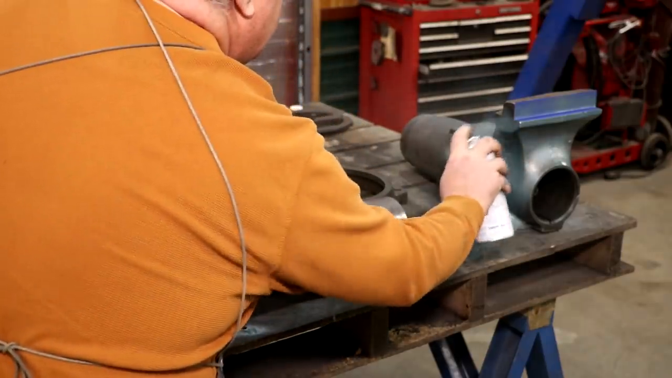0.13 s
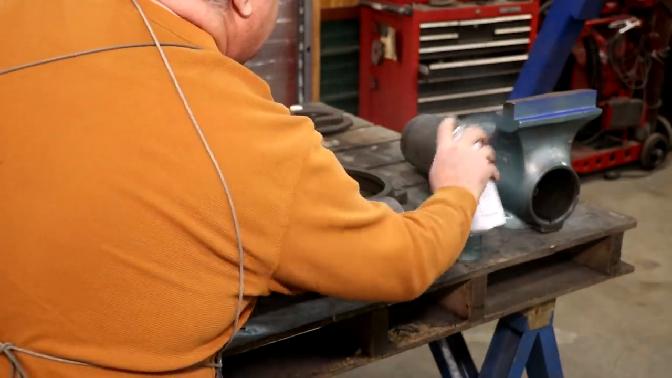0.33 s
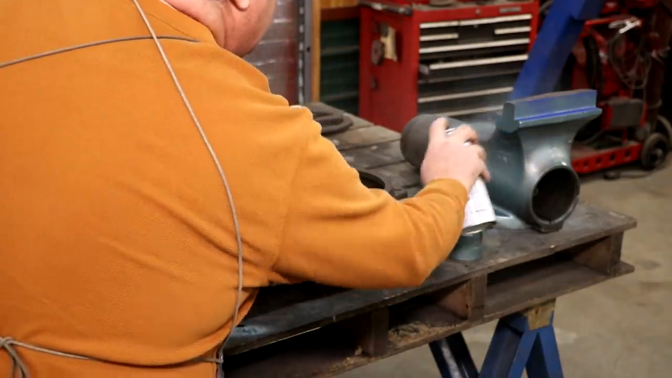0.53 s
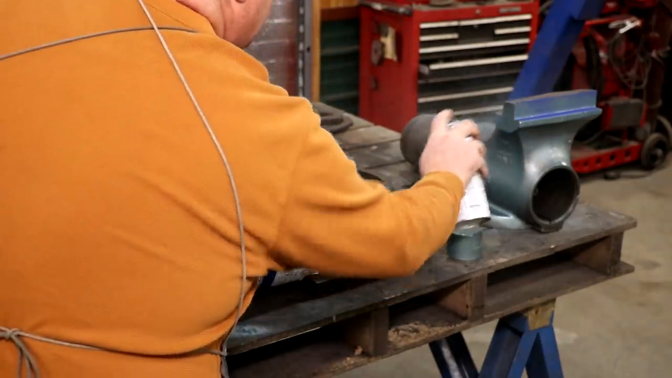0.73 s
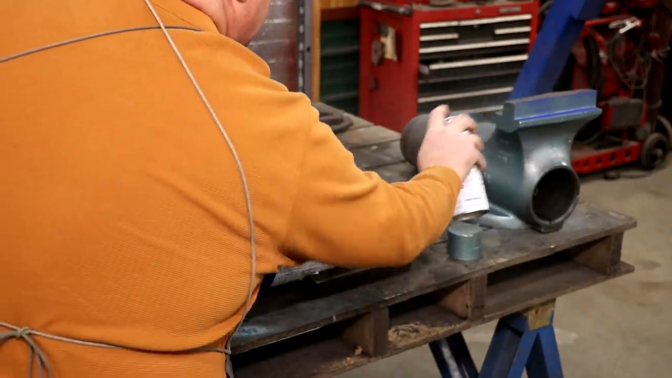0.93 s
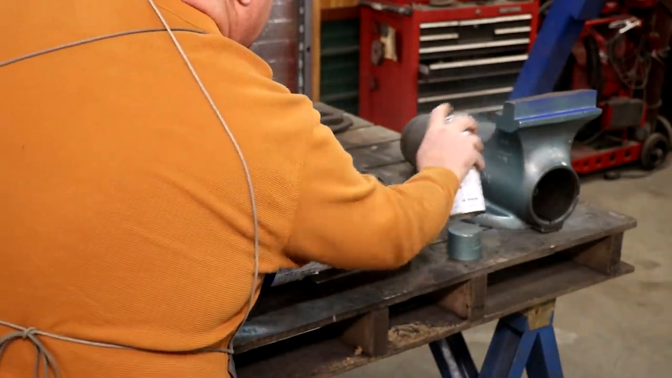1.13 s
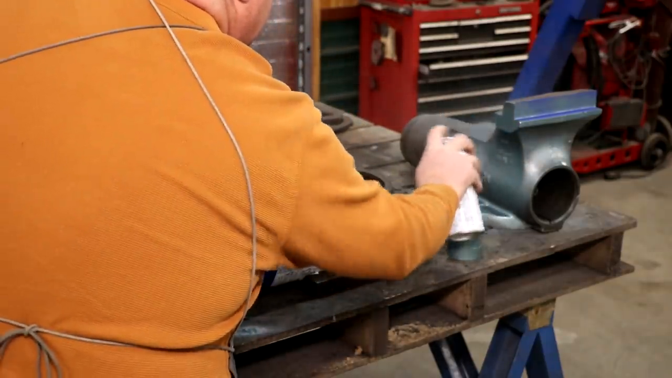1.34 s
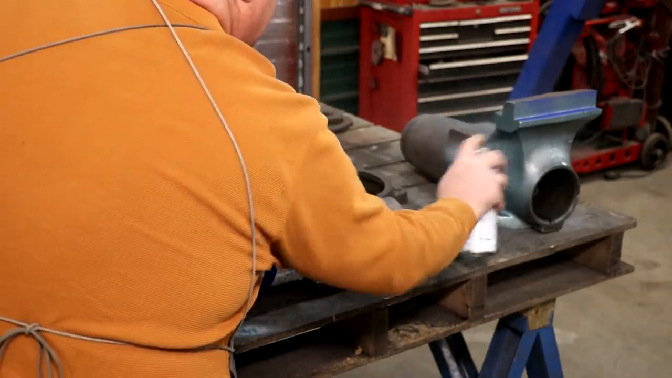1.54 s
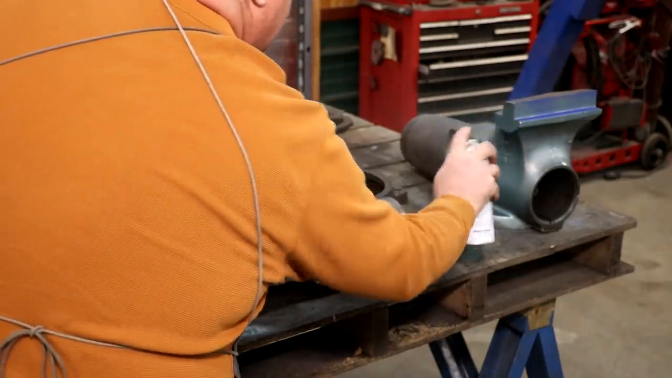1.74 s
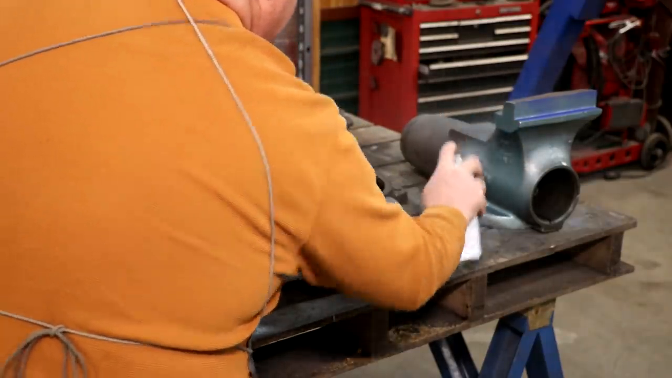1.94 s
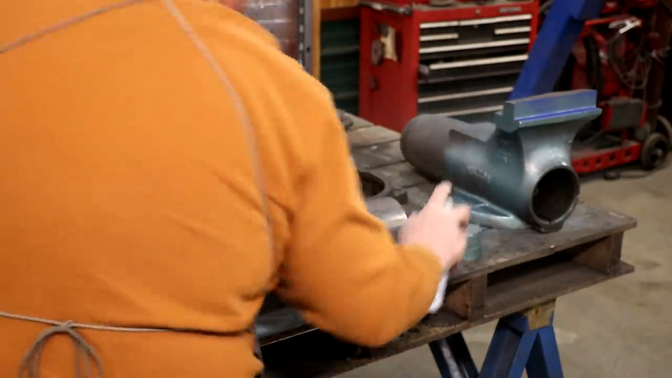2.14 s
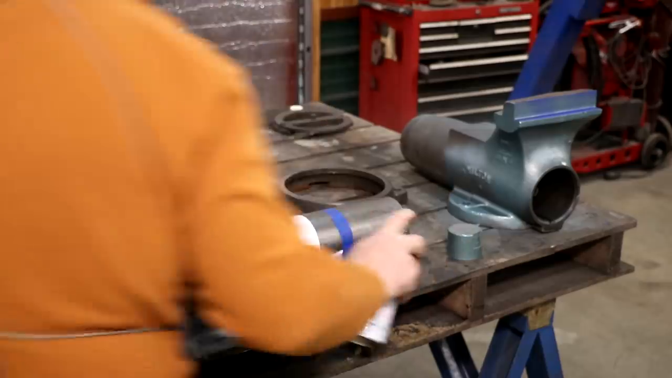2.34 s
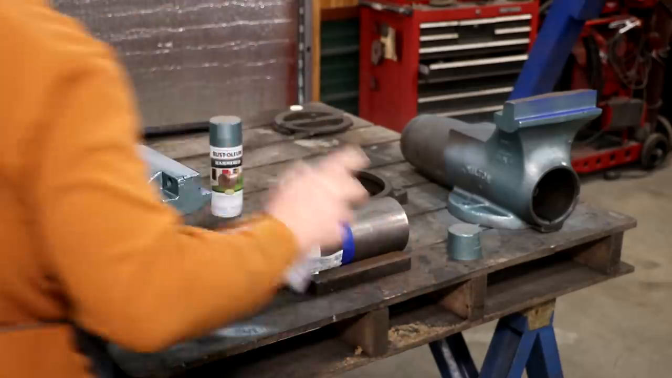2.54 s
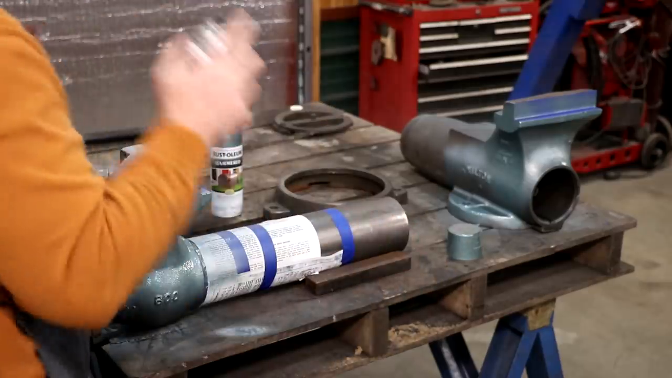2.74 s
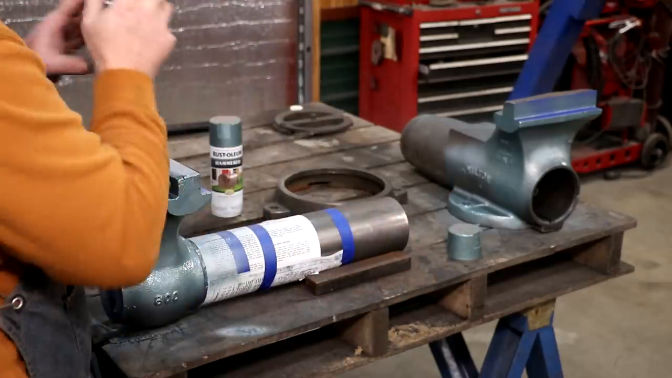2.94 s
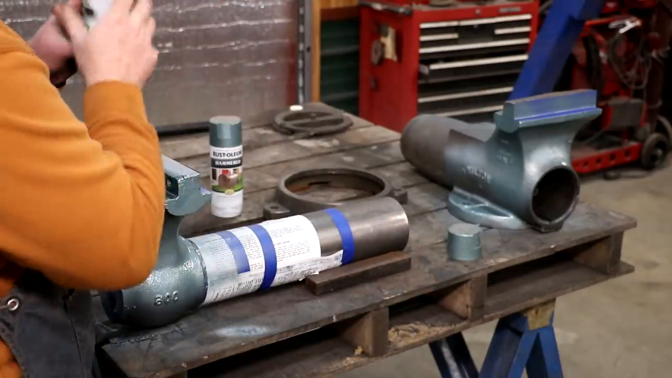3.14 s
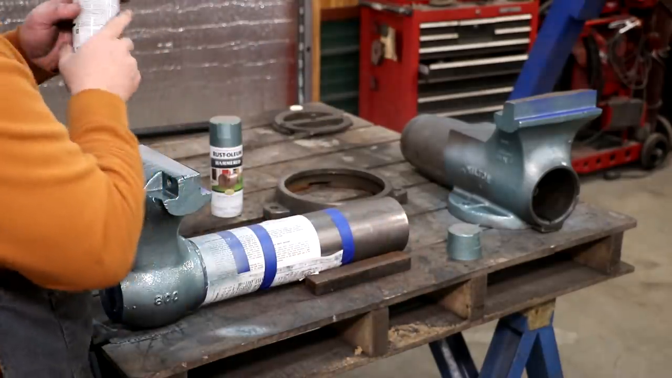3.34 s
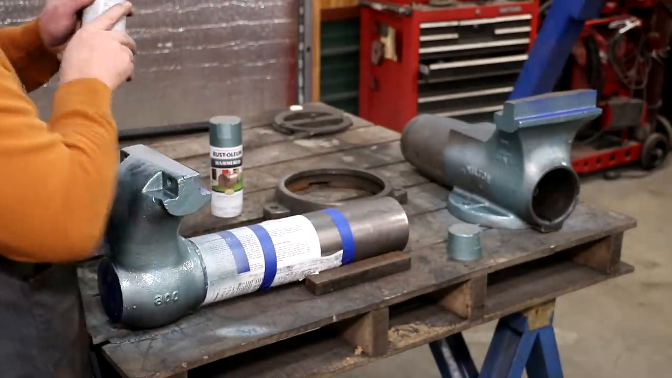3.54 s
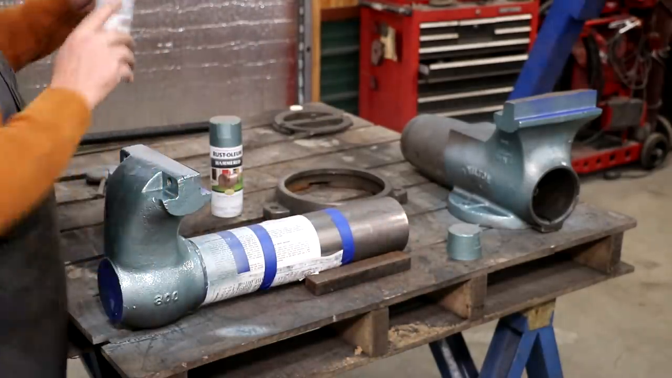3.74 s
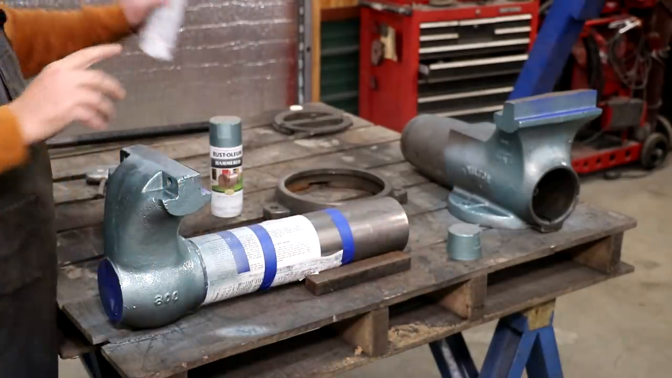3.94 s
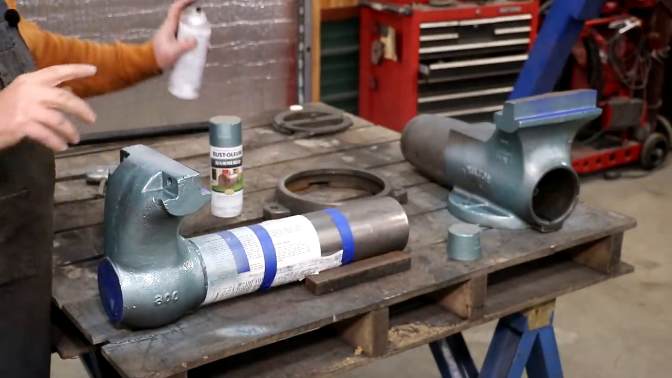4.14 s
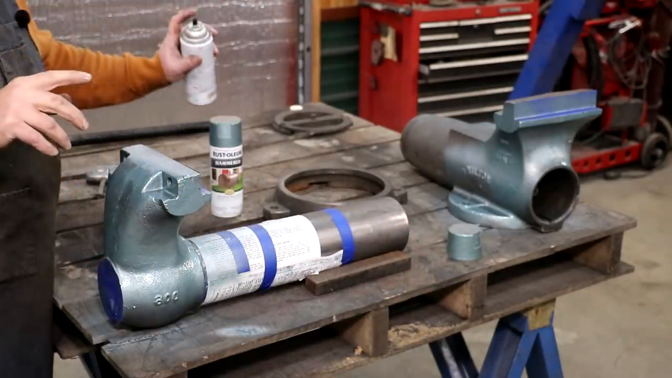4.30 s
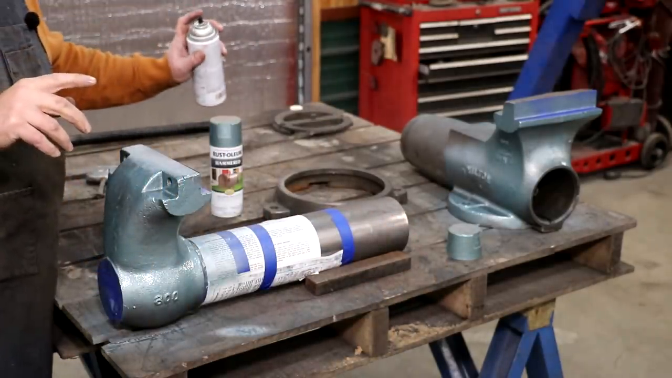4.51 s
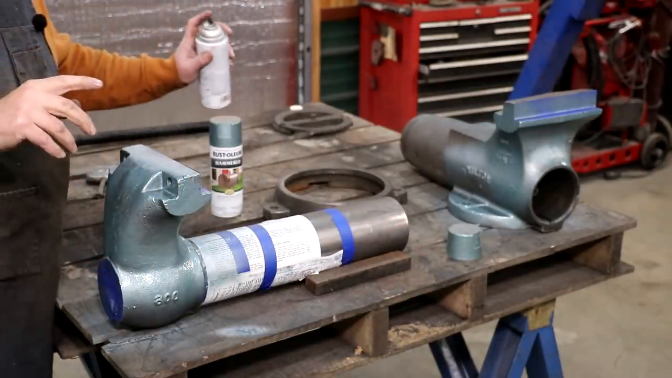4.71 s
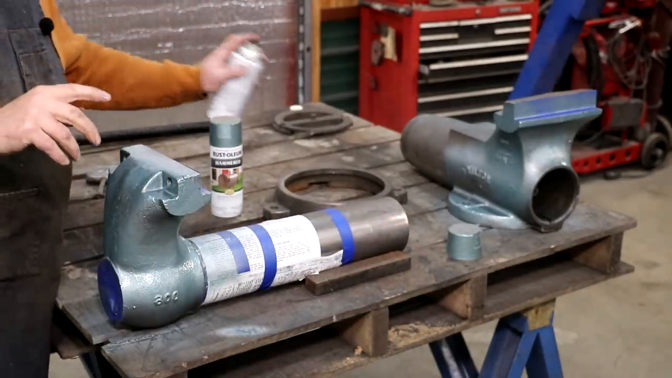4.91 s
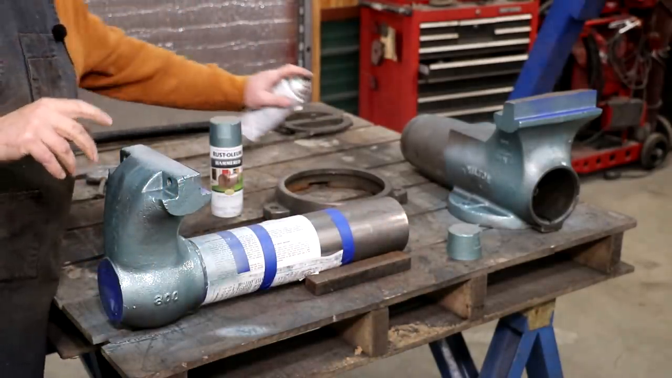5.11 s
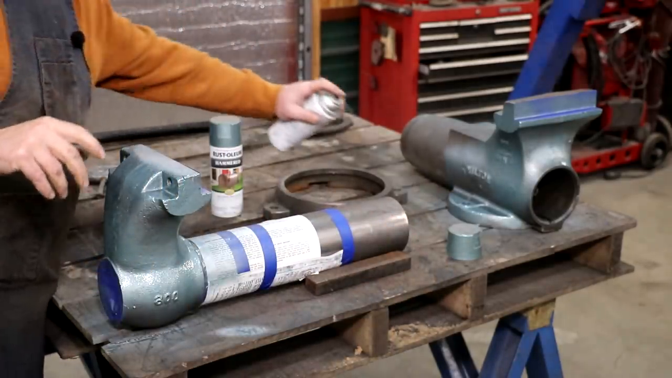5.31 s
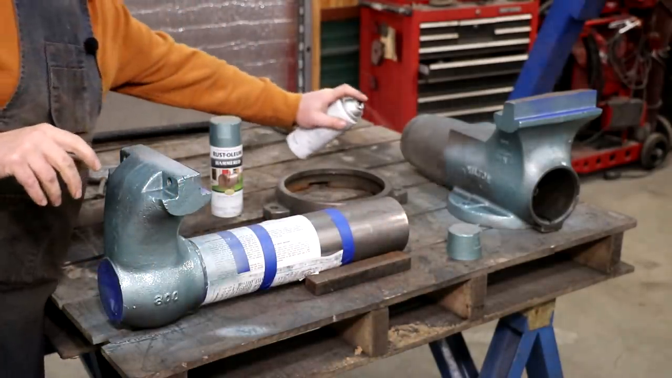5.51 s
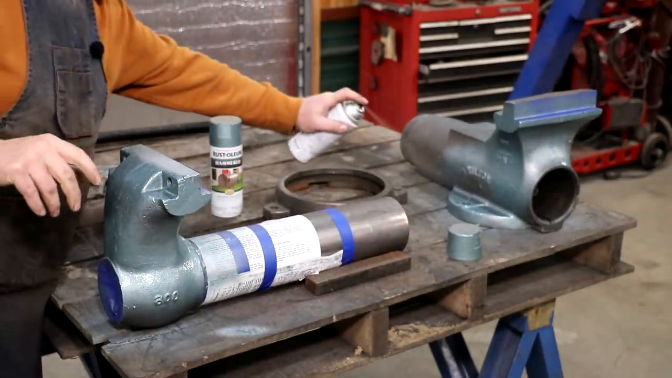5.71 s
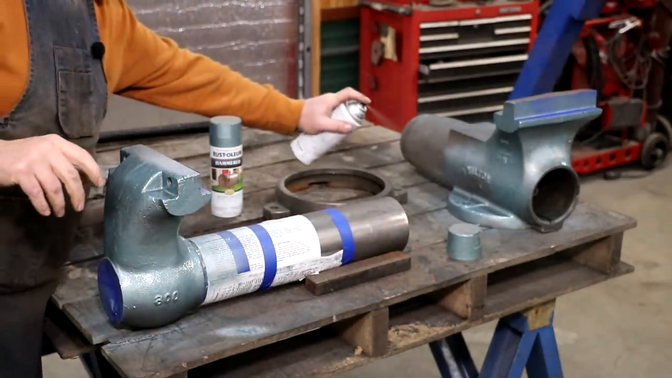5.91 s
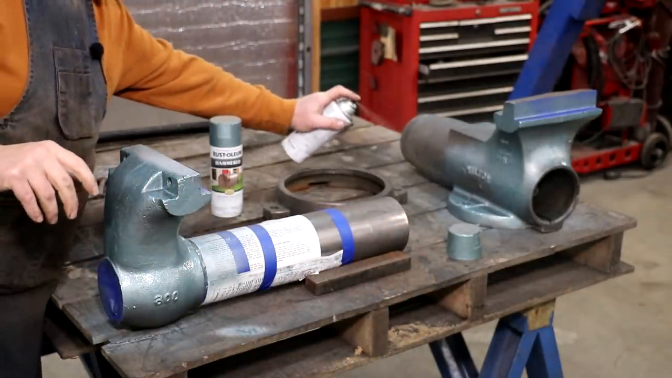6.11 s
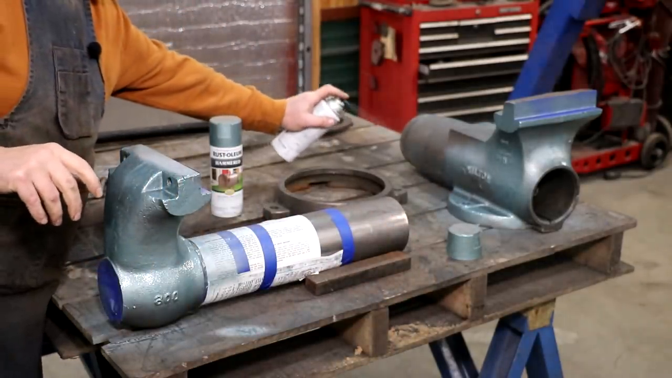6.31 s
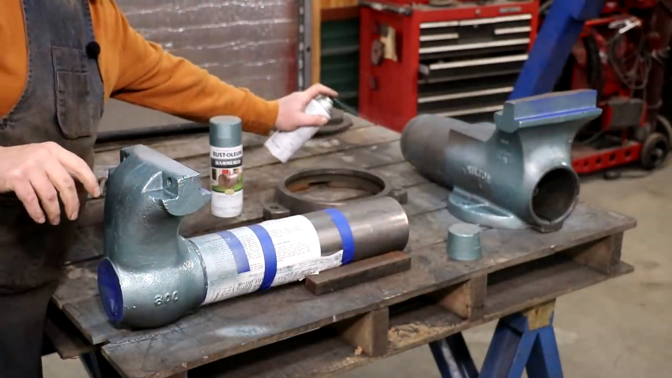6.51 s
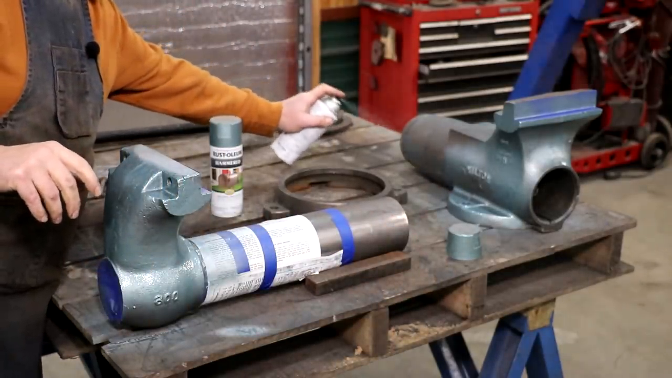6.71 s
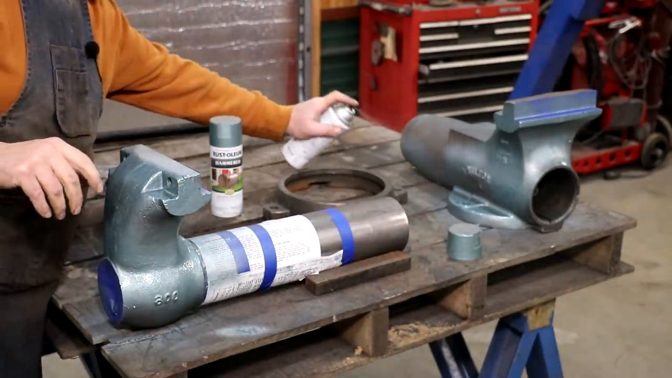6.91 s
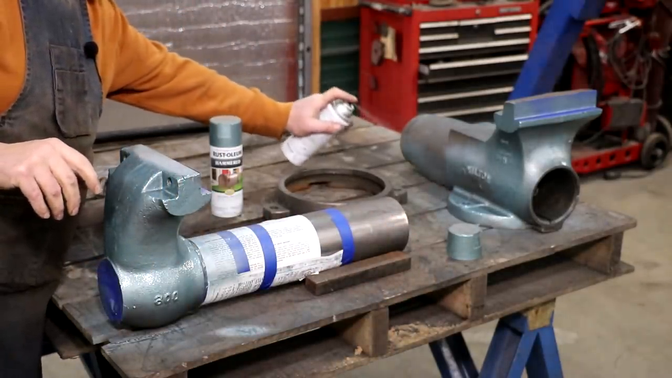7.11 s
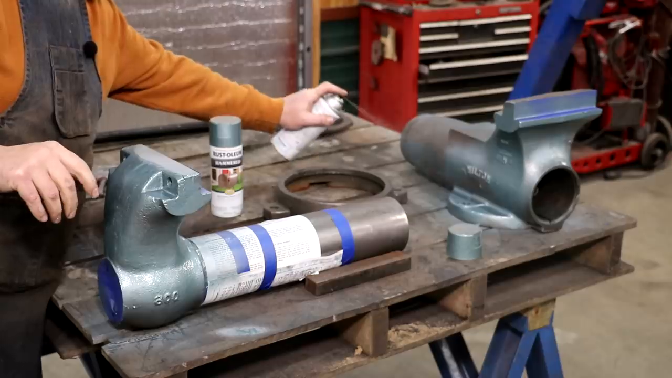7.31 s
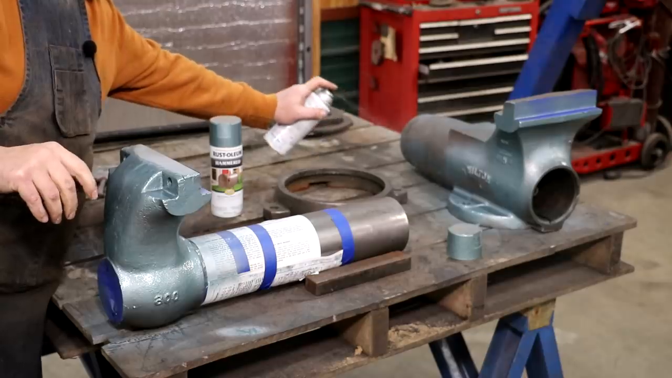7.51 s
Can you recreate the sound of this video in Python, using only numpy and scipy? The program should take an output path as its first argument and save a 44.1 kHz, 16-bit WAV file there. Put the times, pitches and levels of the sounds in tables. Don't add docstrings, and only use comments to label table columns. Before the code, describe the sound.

In a workshop, heard from a small clip-on microphone, an aerosol can sprays with a full, bright, wavering hiss for two seconds. It cuts off; coat cloth swishes and rumbles against the microphone while the mixing ball rolls and knocks sharply inside the steel can. A short squirt runs into a second, slightly thinner hiss. Near the end a metal part is knocked, rings dully and rattles on boards as everything fades.

```python
import sys
import numpy as np
from scipy import signal
from scipy.fft import rfft, irfft
from scipy.io import wavfile
from scipy.ndimage import uniform_filter1d

SR = 44100
rng = np.random.default_rng(int(sys.argv[2]) if len(sys.argv) > 2 else 0)


def invert_db(x):
    u = np.asarray(x, float) / 20
    return 10 ** u


def int16_out(signal):
    q = np.round(np.clip(np.atleast_2d(signal).T, -1, 1) * 32767)
    wavfile.write(sys.argv[1], SR, q.astype(np.int16))


N = 332955
TIME = np.arange(N) / SR
FREQ = np.maximum(np.fft.rfftfreq(N, 1 / SR), 1)
TOP_HZ = 15750


def unit(x):
    return x / np.sqrt(np.mean(x ** 2))


def shape(points, hz_at=FREQ):
    hz, db = np.transpose(points)
    return invert_db(np.interp(np.log(hz_at), np.log(hz), db)) * (hz_at < TOP_HZ)


def coloured_noise(points):
    return unit(irfft(rfft(rng.standard_normal(N)) * shape(points), N))


def bandpass(low_hz, high_hz):
    return signal.butter(2, [low_hz, high_hz], "bandpass", fs=SR, output="sos")


def walk(rate):
    hold = int(SR / 64 / rate) + 1
    steps = np.repeat(rng.standard_normal(N // 64 // hold + 2), hold)
    steps = uniform_filter1d(uniform_filter1d(steps, hold), hold)
    return np.interp(TIME, np.arange(len(steps)) * 64 / SR, steps / steps.std())


def swells(s, peaks_db, fall_s, still_db):
    rise_share, roundness = .8, 1.6
    t = TIME[::64, None] - s
    from_peak = np.where(t < 0, -t / rise_share, t) / fall_s
    db = peaks_db - 10 * from_peak ** roundness
    power = np.sum(invert_db(db) ** 2, axis=1) + invert_db(still_db) ** 2
    return np.interp(TIME, TIME[::64], 10 * np.log10(power))


def grains(spread_db):
    sizes = uniform_filter1d(invert_db(spread_db * rng.exponential(size=N)), size=12)
    return unit(rng.standard_normal(N) * sizes)


def echoes(hz, sweep, count, longest_s, drift, gain):
    total = np.ones((len(hz), len(sweep)), complex)
    frames = np.linspace(0, N - 1, len(sweep)).astype(int)
    for delay_s in longest_s * rng.uniform(0.1983, 1, size=count):
        path_s = delay_s * sweep * (1 + drift * walk(3.0)[frames])
        total += gain * walk(9.0)[frames] * np.exp(2j * np.pi * np.outer(hz, path_s))
    power = np.abs(total) ** 2
    return np.sqrt(power / uniform_filter1d(power, size=12, axis=0))


def banded(source, colour, bands_hz, levels_db, patch_db, patch_hz, patch_s, peak_hz=None, peak_db=0):
    hz, t, z = signal.stft(source, SR, nperseg=512, noverlap=384)
    hz = np.maximum(hz, 1)
    gain = shape(colour, hz)
    own_db = [10 * np.log10(np.sum(gain[(hz > a) & (hz < b)] ** 2) / len(hz)) for a, b in bands_hz]
    centres = np.log(np.prod(bands_hz, axis=1)) / 2
    order = np.argsort(centres)
    db = 0
    for k, (level, own) in enumerate(zip(levels_db, own_db)):
        share = np.interp(np.log(hz), centres[order], order == k)
        db = db + np.outer(share, np.interp(t, TIME, level) - own)
    patches = rng.standard_normal(z.shape)
    for axis, size in enumerate([patch_hz / hz[1], patch_s / t[1]]):
        for _ in range(2):
            patches = uniform_filter1d(patches, int(size) + 1, axis=axis)
    db = db + patch_db * (.7 + hz[:, None] / 13000) * patches / patches.std()
    if peak_hz is not None:
        centre_hz = np.interp(t, TIME, peak_hz)
        db = db + peak_db * (np.exp(-((hz[:, None] - centre_hz) / 450) ** 2) - .3)
        sweep = np.sqrt(peak_hz.mean() / centre_hz)
        z = z * echoes(hz, sweep, count=12, longest_s=.005, drift=.08, gain=.18)
    return signal.istft(z * gain[:, None] * invert_db(db), SR, nperseg=512, noverlap=384)[1][:N]


def read(table, fade_s):
    s, *columns = np.transpose(table)
    gate = np.clip(np.minimum(TIME - s[0], s[-1] - TIME) / fade_s + 1, 0, 1)
    return [np.interp(TIME, s, c) for c in columns], gate


def ring(x, modes):
    out = np.zeros(len(x))
    for hz, db, t60 in modes:
        pole = np.exp(2j * np.pi * hz / SR - np.log(1000) / (t60 * SR))
        out += invert_db(db) * signal.lfilter([1], [1, -pole], x).imag
    return out


def struck(modes, gains_db, t):
    hz, db, t60 = np.array(modes).T[:, :, None]
    sign = rng.choice([-1, 1], size=hz.shape)
    decay = invert_db(db + gains_db[:, None] - 60 * t / t60)
    return np.sum(sign * decay * np.sin(2 * np.pi * hz * t), axis=0)


def add(out, s, x, peak_db):
    i = int(s * SR)
    out[i:i + len(x)] += (invert_db(peak_db) * x / np.abs(x).max())[:N - i]


# low_hz, high_hz
JET_BANDS = [(2500, 5500), (500, 2000), (6000, 8500), (11000, 15500)]


def spray(table, colour, nozzle_db, ridge_db):
    (jet_db, peak_hz, mist_db), gate = read(table, 0.0029)
    swell_db = jet_db - np.average(jet_db, weights=gate)
    follows = (.2, .3, .3)
    levels_db = [jet_db] + [db + share * swell_db for db, share in zip(nozzle_db, follows)]
    levels_db[-1] = levels_db[-1] + mist_db + 1.2 * walk(14)
    jet = banded(grains(2.64), colour, JET_BANDS, levels_db, 1.5, 380, 0.06, peak_hz, peak_db=ridge_db)
    return gate * invert_db(0.56 * walk(40)) * jet


# pitch_hz, level_db (per Hz)
JET_NEAR = [(150, -50), (250, -23), (683, -12), (949, -17.5), (1210, -13), (2300, -15), (2980, -5.5),
            (4070, -1.5), (4670, -2), (5850, -11), (8130, -10.5), (9670, -22), (14200, -17), (15700, -18)]
# start_s, level_db, brightest_hz, mist_change_db
FIRST_PASS = [(0, -31, 3600, 0.1), (.064, -35, 3950, 0.1), (.15, -32.5, 4000, 0.1), (.45, -34, 4000, 0.1),
              (.66, -33, 4050, 0.1), (.76, -35.5, 4050, 0.1), (.93, -29.5, 4350, 0.1),
              (1.03, -33, 4100, 0.1), (1.14, -32, 3900, 0.1), (1.235, -36.5, 4000, 0.1),
              (1.27, -34, 3900, 0.1), (1.41, -29.5, 4500, 0.1), (1.54, -34, 4100, 0.1),
              (1.75, -32, 4300, 0.1), (1.975, -32.5, 4100, 0.1)]


def first_pass():
    return spray(FIRST_PASS, JET_NEAR, nozzle_db=(-44.5, -43.5, -47), ridge_db=3.0)


# pitch_hz, level_db (per Hz)
SHOP_AIR = [(18, -33), (30, -12), (52, -10), (81, -27), (401, -25), (549, -27), (1300, -3.5), (1410, -2),
            (1570, -11), (2260, -11), (15700, -38)]


def still_air():
    return invert_db(-55) * coloured_noise(SHOP_AIR)


def room_tail(near):
    t60_s, level_db = 0.4, -16
    t = TIME[:SR // 2]
    tail = rng.standard_normal(len(t)) * invert_db(-60 * t / t60_s) * (t > .004)
    tail = signal.lfilter([1], [1, -.5], tail)
    return invert_db(level_db) * signal.fftconvolve(near, tail / np.linalg.norm(tail))[:N]


# pitch_hz, level_db (per Hz)
RUMBLE_COLOUR = [(12, -51), (20, -22.5), (97, -0.5), (394, -5.5), (756, -10.5), (1080, -24.5), (1200, -20),
                 (1560, -43), (2640, -120)]
# start_s, level_db, fall_10_db_s
RUBS = [(.9, -55.5, 2.6), (1.22, -50, .05), (2.1, -47, .12), (2.33, -45, .12), (2.48, -38, .09),
        (2.82, -46, .15), (3.04, -40, .15), (3.4, -48, .5), (3.77, -39, .13), (4.0, -48, .2),
        (4.29, -50, .1), (4.48, -58, .1), (4.62, -51, .1), (4.83, -54, .12), (5.0, -53, .15),
        (5.18, -48, .1), (5.31, -47, .07), (5.47, -53, .25), (5.72, -51, .12), (5.87, -50, .05),
        (6.5, -56.5, 1.5), (6.98, -45, .06), (7.3, -57, .6)]
# start_s, level_db (peak), pitch_hz
THUMPS = [
    (2.154, -25.5, 370),
    (4.825, -38.5, 275),
    (5.196, -33.5, 275),
    (5.421, -31, 296),
    (5.659, -36, 240),
    (5.711, -38, 266),
    (5.851, -33.5, 194),
]


def microphone_rub():
    db = swells(*np.transpose(RUBS), still_db=-62)
    out = invert_db(db + 2.0 * walk(20)) * coloured_noise(RUMBLE_COLOUR)
    t = TIME[:SR // 20]
    for s, peak_db, hz in THUMPS:
        add(out, s + 0.00406, np.sin(2 * np.pi * hz * t) * np.exp(-t * hz * 1.36), peak_db)
    return out


# pitch_hz, level_db (per Hz)
CLOTH = [(180, -18), (300, -15), (582, -10), (746, -1.5), (1070, -9), (1400, -2.5), (2150, -2),
         (2810, -5.5), (3660, 1), (15700, -19.5)]
# low_hz, high_hz
CLOTH_BANDS = [(2500, 5800), (8500, 15500), (500, 1500)]
# start_s, level_db (swish), fall_10_db_s, fine_minus_swish_db, dull_minus_swish_db
STROKES = [(1.99, -50, .06, -12, -7), (2.11, -49, .08, -19, -4), (2.27, -55, .2, -18, -5),
           (2.37, -49, .05, -20.5, -6), (2.55, -48, .25, -24, -5), (2.77, -49, .1, -16, -4),
           (2.91, -39.5, .11, -17, -3), (2.99, -40, .15, -25, -6), (3.08, -44, .08, -6, -7),
           (3.13, -44, .04, -12, -4), (3.22, -41, .04, -15, -18), (3.31, -39, .02, -13, -15),
           (3.372, -39, .015, -11, -17), (3.42, -43, .1, -8, -12), (3.51, -42, .065, -5, -8),
           (3.67, -37.5, .065, -11, -7), (3.82, -40, .08, -17, -10.5), (3.99, -42, .1, -21, -13),
           (4.19, -43, .15, -25, -27), (4.36, -44, .2, -17, -26), (5.09, -47, .15, -17, -5),
           (5.19, -48, .06, -13, -7), (5.3, -46, .06, -6, -13)]


def moving():
    s, db, fall_s, fine_db, dull_db = np.transpose(STROKES)
    still_db = (-66, -72, -59)
    levels_db = [swells(s, db + r, fall_s, still) for r, still in zip((0, fine_db, dull_db), still_db)]
    cloth = banded(grains(2.6), CLOTH, CLOTH_BANDS, levels_db, 1.48, 800, .03)
    return invert_db(2.0 * walk(40)) * cloth


# pitch_hz, level_db, t60_s
CAN = [(1400, -8.5, 0.11), (2650, -11, 0.027), (1740, -5, 0.058), (1830, 6.5, 0.039), (1997, -1, 0.043),
       (2110, -8, 0.2), (3060, -5, 0.075), (3474, -2, 0.039), (3590, -8.5, 0.054), (3833, -1, 0.039),
       (4640, -23, 0.036), (5000, -12, .03), (5820, -2.5, 0.03), (6640, 4, 0.026), (7100, 3, .025),
       (7500, 1, 0.025), (8300, -9, 0.02)]
# pitch_hz, level_db, t60_s
CAN_TOP = [(6250, -12, .04), (9200, -10, .018), (10400, -12, .02), (11400, -8, .016), (13200, -11, .018),
           (14400, -15, .012)]
# start_s, level_db (peak), pitch_hz (strongest ring),
# low_minus_peak_db (under 2.5 kHz), treble_minus_peak_db (over 6 kHz)
KNOCKS = [(3.028, -25, 1850, -13, -12), (3.2794, -28, 1800, -3, -10), (3.2018, -24, 1750, -3, -12),
          (3.2297, -26, 1840, -3, -12), (3.302, -16, 5000, -29, -14), (3.3592, -13.5, 3300, -8, -10),
          (3.4313, -18.5, 3650, -13, -11), (3.6371, -28, 2100, -3, -11), (3.6794, -18, 1740, -5, -12),
          (3.929, -33, 6250, -15, -4), (3.957, -33, 6250, -15, -4), (3.9687, -27, 3850, -15, -12),
          (3.985, -29, 6250, -15, -3), (4.003, -30, 6250, -12, -4), (4.0121, -5.5, 3590, -10.5, -8),
          (4.0617, -20.5, 3500, -5, -20), (4.0924, -25, 1970, -3, -12), (4.1078, -10.5, 3650, -9.5, -4.5),
          (4.139, -18, 6670, -15, -4), (4.2311, -19.5, 6640, -25, -8), (4.257, -21, 6670, -31, -1.5),
          (4.2817, -16.5, 3550, -19, -3), (4.3151, -13.5, 3710, -15, -7), (4.329, -26, 7000, -15, -1.5),
          (4.343, -26, 3700, -15, -4), (4.3593, -25, 1750, -17, -7), (4.8237, -39, 1330, 4, -12),
          (5.0509, -27, 6640, -6, -15), (5.057, -33, 6640, -12, -1.5), (5.069, -33, 6640, -15, -1.5),
          (5.0878, -21.5, 3640, -3, -9), (5.1024, -25, 1750, -9, -16), (5.1213, -16, 5980, -3, -7),
          (5.1494, -26, 2060, -2.5, -8), (5.2005, -30, 5820, -6, -4), (5.894, -31, 4300, -17, -9)]
DEAD_KNOCKS = [(2.585, -41, 7100, -21, .3), (2.6502, -35, 7100, -21, -1.5), (2.7504, -31, 3090, -14, -21),
               (3.3744, -20, 3800, -10.5, -15), (3.326, -32, 7500, -15, -1.5), (3.345, -29, 5000, -5, -5),
               (3.441, -25, 3300, -15, -12), (3.4896, -18, 5580, -15, -12), (3.6667, -19.5, 1800, -2.5, -9),
               (4.1882, -15, 4640, -24, -14), (4.197, -20, 3540, -5, -6), (4.2, -17, 3700, -10.5, -9),
               (4.2035, -19, 4640, -8, -6), (4.2782, -15, 1780, -14, -15), (4.6028, -15, 2900, -30, -15),
               (4.6048, -27, 2650, -19, -13), (4.114, -21, 1740, -1.5, -9), (5.116, -30, 2000, -2.5, -9),
               (4.8732, -32, 1720, -2.5, -12), (5.1383, -20, 3950, -12, -7),
               (5.4218, -26.5, 4220, -2.5, -6)]
SINGING = [
    (3.303, -20, 3590, -23, -33),
    (3.361, -23, 1800, -4, -31),
    (4.013, -20, 1403, -5, -20),
    (4.063, -28.5, 1900, -.7, -26),
    (4.109, -30, 2110, -8, -24),
    (4.278, -30.5, 1780, -5, -24),
    (4.602, -27, 2650, -17, -30),
]


def knocks():
    contact_s, mode_scatter = .0003, .02
    out, t = np.zeros(N), TIME[:SR // 4]
    wall = np.array(CAN + CAN_TOP)
    modes_hz, push = wall[:, 0], 1 - np.exp(-t / contact_s)
    registers = [bandpass(1500, 2620), bandpass(3000, 4780), bandpass(6000, 8000)]
    top = bandpass(9500, 15000)
    kinds = (KNOCKS, -3), (DEAD_KNOCKS, -14), (SINGING, 4)
    events = [(*row, ring_db) for rows, ring_db in kinds for row in rows]
    for s, db, hz, low_db, treble_db, ring_db in events:
        noise = push * rng.standard_normal(len(t))
        for sos, share_db, decay_s in zip(registers, (low_db, -2, treble_db), (.0015, .001, .0017)):
            add(out, s, signal.sosfilt(sos, noise * np.exp(-t / decay_s)), db + share_db)
        add(out, s, signal.sosfilt(top, noise * np.exp(-t / .0006)), db + treble_db - 9)
        register_db = np.where(modes_hz < 2500, low_db, np.where(modes_hz > 6000, treble_db, 0))
        near_db = 15.0 * np.exp(-(np.log(modes_hz / hz) / 0.031) ** 2)
        near_db = near_db + 2.5 * rng.standard_normal(len(wall))
        others = modes_hz != modes_hz[near_db.argmax()]
        spot = wall.copy()
        spot[:, 0] *= 1 + mode_scatter * rng.standard_normal(len(wall)) * others
        add(out, s, push * struck(spot, register_db + near_db, t), db + ring_db)
    return out


# start_s, level_db (middle modes), fall_10_db_s,
# low_minus_middle_db, high_minus_middle_db
ROLLS = [(2.99, -43, .15, -1, -14), (3.09, -39, .06, -3, -17), (3.24, -34.5, .07, 3, -8),
         (3.4, -45, .18, -8, -18), (3.52, -45, .08, 4, -15), (3.67, -41, .08, 5, -18),
         (3.82, -46, .14, 2.5, -14), (3.96, -45, .12, -10, -2), (4.07, -46, .15, -4, -3),
         (4.2, -42, .2, -4, -3), (4.34, -39, .08, -7, -5), (4.47, -46, .14, -5, -10.5),
         (4.93, -60, .14, 9, -20), (5.02, -53, .08, 3, -15), (5.1, -57, .05, 0.5, 8),
         (5.22, -41, .07, -4, -13), (5.38, -53, .11, 9.5, 3), (5.58, -51, .06, -12, 1.5)]


def rolling():
    s, middle_db, fall_s, low_db, high_db = np.transpose(ROLLS)
    levels_db = [swells(s, middle_db + r, fall_s, -90) for r in (low_db, 0, high_db)]
    ticks = grains(3.4) * invert_db(2.0 * walk(40))
    damped = [(hz, db, 0.79 * t60 * min(1, 4000 / hz)) for hz, db, t60 in CAN]
    groups = damped[2:6], damped[6:11], damped[11:17]
    return sum(invert_db(db) * unit(ring(ticks, modes)) for db, modes in zip(levels_db, groups))


# pitch_hz, level_db (per Hz)
JET_FAR = [(120, -39), (200, -16), (438, -29), (598, -11), (961, -19.5), (1410, -14.5), (2820, -17),
           (4540, -7.5), (7430, 1.5), (9420, -17.5), (11500, -14), (15700, -16.5)]
# start_s, level_db, brightest_hz, mist_change_db
SQUIRT = [
    (5.216, -41, 3600, -9),
    (5.24, -37, 4080, 0.1),
    (5.33, -33, 4560, 0.1),
    (5.43, -36.5, 4200, 0.1),
    (5.47, -40, 4300, 0.1),
    (5.575, -41, 4300, -1.5),
]
SECOND_PASS = [(5.592, -33, 4100, 0.1), (5.7, -35, 4300, -1.5), (5.87, -38, 4200, 1.5),
               (5.92, -33.5, 4300, 0.1), (6.07, -35, 4650, 2.5), (6.25, -37, 4500, -3),
               (6.3, -37, 4700, 2.5), (6.42, -36.5, 4750, -1), (6.5, -38, 4100, 0.1),
               (6.62, -35.5, 3900, 0.1), (6.7, -38, 4200, 0.1), (6.87, -37, 4650, -1),
               (7.03, -33, 4150, 2.5), (7.18, -33, 4350, 1), (7.3, -38, 4650, 0.1), (7.55, -38, 4300, -1)]


def second_pass():
    table = np.vstack([SQUIRT, SECOND_PASS])
    return spray(table, JET_FAR, nozzle_db=(-53, -44.5, -46.5), ridge_db=6.5)


# pitch_hz, level_db, t60_s
PART = [(393, -18, 0.36), (572, -8, 0.3), (601, -1.5, .45), (700, -1, .45), (722, -9, .25), (930, -15, .1),
        (1110, -8, .25), (1281, -2.5, .22), (1400, -21, 0.12), (1704, -17, .15), (1830, -14, 0.13),
        (2080, -8, .15), (2214, -1.5, 0.14), (2950, -26, 0.071), (3980, -10, .04), (5400, -9, .04),
        (7400, -12, .04), (9600, -16, .04)]
# start_s, level_db (peak), pitch_hz (centre), tick_db
BLOWS = [
    (6.9554, -21.5, 1240, -20),
    (7.0064, -28, 2070, -26),
    (7.0164, -29, 2170, -23),
    (7.0346, -24, 1730, -25),
    (7.0502, -28, 1840, -28),
    (7.0565, -26, 1700, -30),
    (7.0771, -27, 1620, -30),
    (7.1, -36, 1470, -36),
]
# start_s, level_db (peak), pitch_hz
ROCKING = [
    (7.045, -34, 716),
    (7.05, -42, 545),
    (7.1, -39, 712),
    (7.135, -45, 560),
    (7.152, -47, 703),
    (7.21, -46, 718),
    (7.27, -43, 716),
]


def part():
    out, t = np.zeros(N), TIME[:SR]
    blow_s, blow_db = BLOWS[0][:2]
    add(out, blow_s, (1 - np.exp(-t / .0007)) * struck(PART, np.zeros(len(PART)), t), blow_db + 4.5)
    add(out, blow_s, rng.standard_normal(len(t)) * np.exp(-t / 0.004), blow_db - 3.5)
    attack_s, t60_s = .006, .14
    rock = (1 - np.exp(-t / attack_s)) * invert_db(-60 * t / t60_s)
    for s, db, hz in ROCKING:
        add(out, s, rock * np.sin(2 * np.pi * hz * t), db)
    for s, db, hz, tick_db in BLOWS:
        noise = rng.standard_normal(len(t)) * np.exp(-t / 0.0019)
        add(out, s, signal.sosfilt(bandpass(.7 * hz, 1.3 * hz), noise), db)
        add(out, s, signal.sosfilt(bandpass(3500, 6500), noise), tick_db)
    return out


def clatter():
    level_db, hold_s, t60_s = -37, .08, .8
    t = TIME - BLOWS[0][0]
    db = level_db - 60 * np.maximum(t - hold_s, 0) / t60_s
    return (t > 0) * invert_db(db) * unit(signal.sosfilt(bandpass(800, 2300), grains(3.0)))


def scene():
    near = first_pass() + knocks() + second_pass() + part() + clatter()
    without_room = microphone_rub() + moving() + rolling()
    return np.tile(near + room_tail(near) + without_room + still_air(), (2, 1))


def band_limit(x):
    return signal.sosfilt(signal.butter(12, 16640, fs=SR, output="sos"), x)


def record(dry):
    fade_start_s, fade_db_per_s = 7.17, -15
    faded = dry * invert_db(fade_db_per_s * np.maximum(TIME - fade_start_s, 0))
    mix = signal.sosfilt(signal.ellip(8, .2, 60, 16500, fs=SR, output="sos"), faded)
    return band_limit(mix)


dry = scene()
out = record(dry)
int16_out(out)
```